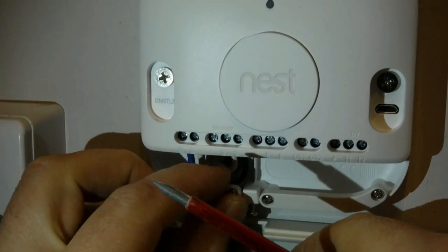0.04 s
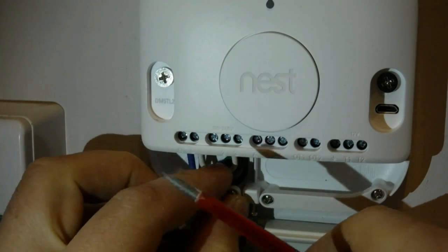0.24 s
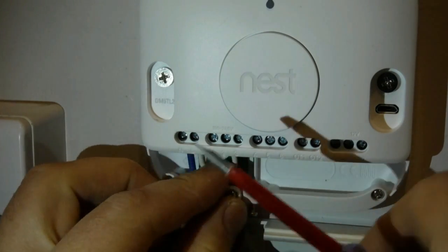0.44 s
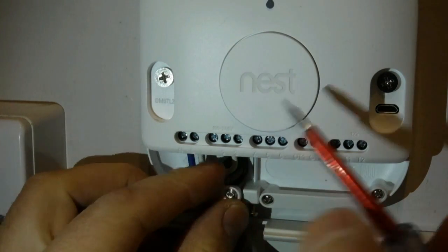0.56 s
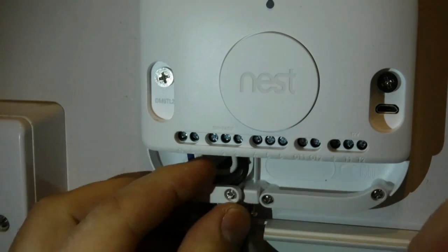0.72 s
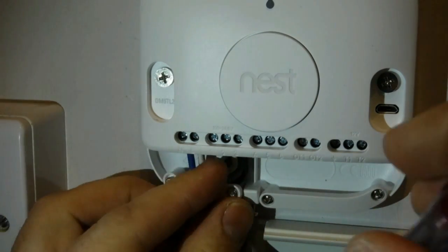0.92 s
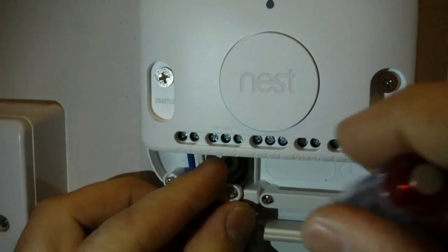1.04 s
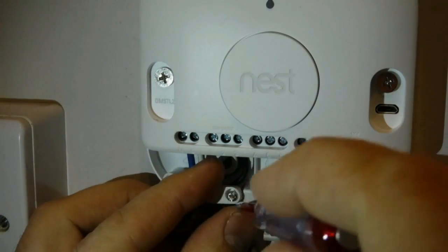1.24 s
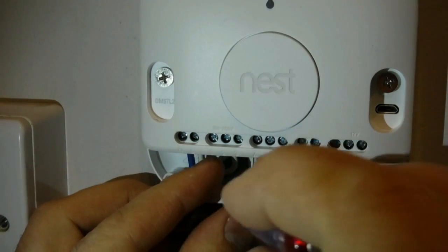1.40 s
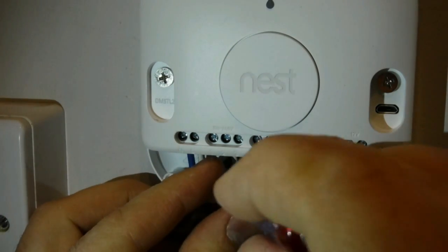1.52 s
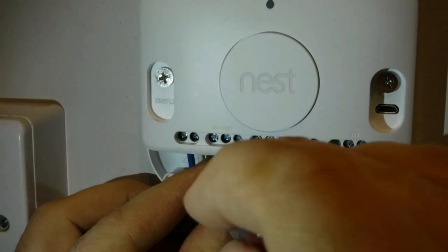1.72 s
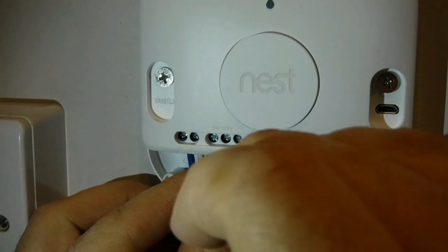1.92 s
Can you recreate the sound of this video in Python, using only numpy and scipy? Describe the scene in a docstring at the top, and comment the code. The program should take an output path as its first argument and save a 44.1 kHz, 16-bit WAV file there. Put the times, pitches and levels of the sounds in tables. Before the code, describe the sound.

Hard plastic clamp snaps sharply twice against a wall housing, with faint rubbing and small ticks

```python
"""In a small room, fingers and a screwdriver work a plastic clamp into a wall-mounted housing.
Snaps and ticks are impulses exciting damped modes; the steel tip rings once in the same way.
Rubbing is filtered grain noise with rough squeaks; dull knocks are decaying low sines.
Drifting low tones and coloured noise lie below; a diffuse echo follows the snaps and ticks."""
import sys
import numpy as np
from scipy import signal
from scipy.fft import rfft, irfft
from scipy.io import wavfile

SR = 44100
rng = np.random.default_rng(int(sys.argv[2]) if len(sys.argv) > 2 else 0)


def attenuation_scalar(level_db):
    """Turn a level in dB into a linear amplitude multiplier (20 dB per decade)."""
    decades = np.asarray(level_db, float) / 20
    return 10 ** decades


def digitize_waveform(pressure):
    """Quantize a signal to 16-bit integers and store it at the path in sys.argv[1].

    Rows of a 2-D input are taken as channels; values are limited to [-1, 1].
    """
    field = np.atleast_2d(pressure).T
    bounded = np.clip(field, -1, 1)
    quanta = np.round(bounded * 32767).astype(np.int16)
    wavfile.write(sys.argv[1], SR, quanta)


N = 85995   # length [samples]

# steady noise spectrum of the room, relative: (frequency [Hz], density [dB per Hz])
ROOM_SPECTRUM = [(12, -36), (20, -3), (63, -9), (113, -9.5), (177, -7.5), (293, -12), (377, -12),
                 (949, -16), (1530, -19.5), (2750, -24.5), (3340, -22.5), (12800, -26.5), (16000, -29.5)]
ROOM_TONE_DB = -53   # rms
WHIRR_HZ, WHIRR_WIDTH_HZ, WHIRR_DB = 1585, 210, -63.5   # steady band in the room tone
# shuffling hands, low-mid noise before a common 6.5 dB cut: (time [s], level [dB])
SHUFFLE = [(0.0, -53), (0.352, -55), (1.052, -48.5), (1.498, -58), (1.95, -57)]

# wavering low hum: (time [s], level [dB])
HUM = [(0.0, -58), (0.02, -58), (0.358, -65), (0.374, -64), (0.494, -49), (0.612, -53.5), (0.722, -65),
       (0.824, -52), (0.994, -50.5), (1.704, -62.5), (1.738, -64.5), (1.95, -60)]
HUM_HZ, HUM_WANDER_HZ = 60.6, 3.3
# lower handling rumble: (time [s], level [dB])
RUMBLE_LOW = [(0.0, -65), (0.248, -73), (0.52, -60), (0.602, -79), (0.754, -48), (0.858, -47.5),
              (0.89, -67), (1.102, -73), (1.15, -43.5), (1.238, -70), (1.302, -43), (1.374, -58),
              (1.688, -68.5), (1.95, -65)]
# upper handling rumble: (time [s], level [dB])
RUMBLE_HIGH = [(0.0, -73), (0.016, -74), (0.58, -59), (0.624, -68), (0.808, -47), (1.058, -68.5),
               (1.2, -48), (1.248, -65), (1.292, -48.5), (1.4, -75), (1.438, -53.5), (1.808, -81),
               (1.884, -54.5), (1.95, -61)]
# pitch of the lower and upper rumble: (frequency [Hz], rms wander [Hz])
RUMBLE_PITCHES = [(95, 7.3), (170, 8.2)]

# the clamp strikes the housing: (time [s], level before a common 3 dB cut [dB],
# added housing gain [dB], rattle decay constant [s], centre of the crack [Hz])
SNAPS = [(0.0236, -34, -40, .0005, 9000), (0.122, -27, -14, 0.0023, 8000),
         (0.1242, -11.5, -20, 0.00018, 7500), (0.1251, -1.5, -29.5, 0.00036, 8550),
         (0.1261, -3, -24.5, 0.0016, 9200), (0.21, -31.5, -47, .002, 7800), (0.404, -43, -27, 0.0022, 7500),
         (0.8215, -14, -7.5, 0.00079, 6900), (0.8233, -13, -13.5, 0.0014, 8800),
         (0.8249, -14, -16, .002, 8450), (0.965, -37, -8, 0.00077, 7000), (0.969, -25, -10, 0.0032, 6600),
         (1.061, -40.5, -6.5, 0.0026, 5000), (1.147, -37.5, -14, .002, 7500),
         (1.185, -37, -30, .004, 11400), (1.27, -44, -30, .002, 7000), (1.2834, -28, -19, 0.0027, 7200),
         (1.8503, -39, -34, 0.0023, 6060), (1.8935, -39, -22, .0005, 6500), (1.895, -30, -15, 0.0011, 6000),
         (1.9085, -44, -30, .001, 6900), (1.9132, -30, -30, .001, 6500), (1.9231, -35, -34, .002, 7000),
         (1.9252, -27.5, -30, 0.0022, 5460), (1.9305, -39, -30, .002, 6000),
         (1.9365, -33, -26, 0.0011, 7400), (1.943, -38, -28, 0.0028, 6240)]
# bright modes of the clamp: (frequency [Hz], level before spread and fall [dB], t60 [s])
CLAMP_MODES = [(3800, -16, 0.012), (5200, -13.5, 0.0077), (6100, -7.5, 0.012), (6800, -3, 0.0035),
               (7400, -3, 0.0078), (7630, -7.5, 0.0093), (8900, -0.5, 0.0062), (9830, -6, 0.009),
               (10980, -6.5, 0.0038), (11980, -9.5, 0.0035), (11870, -8.5, 0.0034), (13600, -8, 0.0047),
               (15700, -14, .003)]
# low modes of the housing: (frequency [Hz], level before spread [dB], t60 [s])
HOUSING_MODES = [(335, -8, 0.013), (491, -15, 0.047), (747, -9, 0.042), (1227, -3.5, 0.014),
                 (1680, -2, 0.0088), (1930, -2, 0.0058), (2590, 0.5, 0.014), (3400, 3, 0.0031),
                 (4120, 1.5, 0.0041)]
RATTLE_PER_S, RATTLE_SPREAD_DB = 3000, 4
MODE_SPREAD_DB = 1.5   # standard deviation from strike to strike
MODE_FALL_DB = 10   # loss one octave from the crack's centre; grows with octaves squared
CLAMP_LOW_CUT_HZ = 3200
CRACK_DB, CRACK_OCTAVES = 17, 0.84   # gain and width of the dry contact crack
SPOTS = 3   # strikes land on different spots, each with its own echo pattern

# echo of the room, before a common 22.5 dB cut: (frequency [Hz], t60 [s], level [dB])
ECHO = [(400, 0.24, -3), (1020, 0.14, -3.5), (3020, 0.15, -3.5), (5000, 0.15, -2.5), (7500, 0.18, -9.5),
        (11200, 0.11, -5), (14700, .09, -9.5)]
ECHO_START_S = 0.002
EARLY_DB, EARLY_T60_S = 2.5, 0.024   # nearby wall: stronger first echoes

# fingers rub plastic: (start [s], length [s], level [dB], centre [Hz], width [octaves])
RUBS = [(0.049, 0.064, -52, 6500, 1), (0.313, 0.1, -55, 7540, 0.52), (0.427, 0.05, -51.5, 8130, 0.35),
        (0.429, 0.037, -52.5, 3470, 1.1), (0.54, 0.033, -54.5, 1580, 1.4), (0.668, .14, -47.5, 7400, 0.78),
        (0.903, .06, -58, 7500, 0.64), (0.973, 0.094, -55, 8800, .9), (1.104, 0.13, -55.5, 7900, 0.69)]
RUB_GRAINS_PER_S, RUB_UNEVEN_DB = 9900, 1.5
STROKE_ATTACK_S, STROKE_RELEASE_S = 0.019, 0.02
# thin squeaks in the rubbing: (start [s], length [s], level [dB], from [Hz], to [Hz])
SQUEAKS = [(0.07, .025, -58, 3000, 3020), (0.67, 0.16, -52, 2960, 3030), (0.689, 0.069, -52.5, 7100, 7300),
           (0.694, 0.046, -55, 8900, 8900)]
SQUEAK_ROUGH_HZ = 170   # upper edge of the noise modulating each squeak

# dull knocks through the wall plate: (time [s], level [dB], frequency [Hz], t60 [s])
KNOCKS = [(0.065, -48, 800, 0.045), (0.073, -44, 750, 0.045), (0.579, -46, 400, 0.19),
          (0.845, -55, 360, 0.065), (0.854, -33, 702, .09), (0.879, -44, 730, 0.039),
          (1.064, -40.5, 760, .06)]
KNOCK_RISE_PER_S = 1200   # rate of the exponential onset

# tiny single-pitched ticks: (time [s], level [dB], frequency [Hz])
PIPS = [(0.328, -47, 3070), (0.372, -45, 3500), (1.172, -43.5, 5170), (1.221, -41.5, 5200)]
PIP_T60_S = 0.0079
# the steel tip touches: (time [s], level [dB])
TIP_TOUCH = [(0.557, -40.5)]
# modes of the screwdriver shaft: (frequency [Hz], level relative to the touch [dB], t60 [s])
SHAFT_MODES = [(2296, -10, 0.11), (6400, -7, 0.035), (7677, -8.5, 0.18), (9240, -7, 0.066),
               (9600, -16, .07), (10600, -14, 0.18), (11600, -16, .05)]

TOP_CUT_HZ = 16400


def rms_one(x):
    """Power normalisation: scale to unit root mean square."""
    return x / np.sqrt(np.mean(x ** 2) + 1e-20)


def level_curve(rows):
    """Linear interpolation of a level [dB] over time, at every sample."""
    s, db = np.transpose(rows)
    return np.interp(np.arange(N) / SR, s, db)


def band(x, low_hz, high_hz):
    """Band-pass filtering with a maximally flat (Butterworth) response."""
    sos = signal.butter(2, [low_hz, high_hz], "band", fs=SR, output="sos")
    return signal.sosfilt(sos, x)


def octave_edges(centre_hz, octaves):
    """Logarithmic pitch: band edges lie equal ratios about the centre."""
    half = 2 ** (octaves / 2)
    return centre_hz / half, centre_hz * half


def ring(clicks, hz, t60):
    """Damped resonance: a unit impulse excites an exponentially decaying sine."""
    radius = attenuation_scalar(-60 / (t60 * SR))
    angle = 2 * np.pi * hz / SR
    feedback = [1, -2 * radius * np.cos(angle), radius ** 2]
    return signal.lfilter([0, np.sin(angle)], feedback, clicks + 1e-18)


def click_at(s):
    """Impulsive excitation: one unit sample at time s."""
    return 1.0 * (np.arange(N) == int(s * SR))


def grains(per_s, spread_db, size):
    """Shot noise: random impulses of uneven size and either sign."""
    hits = rng.random(size) < per_s / SR
    heights = attenuation_scalar(spread_db * np.minimum(rng.exponential(1, size), 3))
    return hits * heights * rng.choice([-1, 1], size)


def stroke(s, length):
    """Amplitude envelope: linear attack, hold, exponential release."""
    t = np.arange(N) / SR
    attack = np.clip((t - s) / STROKE_ATTACK_S, 0, 1)
    return attack * np.exp(-np.maximum(t - s - length, 0) / STROKE_RELEASE_S)


def room_tone():
    """Stationary noise shaped by a spectral density, with a steady whirr and shuffling low mids."""
    hz = np.arange(N // 2 + 1) * SR / N + 1e-3
    f, db = np.transpose(ROOM_SPECTRUM)
    colour = attenuation_scalar(np.interp(np.log(hz), np.log(f), db))
    tone = rms_one(irfft(rfft(rng.standard_normal(N)) * colour, N))
    half = WHIRR_WIDTH_HZ / 2
    whirr = rms_one(band(rng.standard_normal(N), WHIRR_HZ - half, WHIRR_HZ + half))
    low_mids = rms_one(band(rng.standard_normal(N), 167, 2190))
    shuffle = attenuation_scalar(level_curve(SHUFFLE) - 6.5) * low_mids
    return attenuation_scalar(ROOM_TONE_DB) * tone + attenuation_scalar(WHIRR_DB) * whirr + shuffle


def wavering(curve, hz, wander_hz):
    """Frequency modulation: slow band noise makes a low tone's pitch drift."""
    noise = rng.standard_normal(N + SR)   # the first second lets the filter settle
    wander = rms_one(band(noise, 2.05, 13.3)[SR:])
    phase = 2 * np.pi * np.cumsum(hz + wander_hz * wander) / SR
    return attenuation_scalar(level_curve(curve)) * np.sqrt(2) * np.sin(phase)


def rumble():
    """Superposition of a hum and two handling tones, each with its own level curve."""
    total = wavering(HUM, HUM_HZ, HUM_WANDER_HZ)
    for curve, (hz, wander_hz) in zip((RUMBLE_LOW, RUMBLE_HIGH), RUMBLE_PITCHES):
        total = total + wavering(curve, hz, wander_hz)
    return total


def rattling_contact(rattle_s, size):
    """Repeated impact: a click and exponentially dying grains, scaled to unit energy."""
    decay = np.exp(-np.arange(size) / (rattle_s * SR))
    force = 0.2 * grains(RATTLE_PER_S, RATTLE_SPREAD_DB, size) * decay
    force[0] = 1
    return force / np.sqrt(np.sum(force ** 2))


def modes(force, table, crack_hz=None):
    """Modal superposition: modes alternate in sign and, given a crack pitch, weaken away from it."""
    total = 0
    for k, (hz, db, t60) in enumerate(table):
        db = db + MODE_SPREAD_DB * rng.normal()
        if crack_hz is not None:
            db -= MODE_FALL_DB * np.log2(hz / crack_hz) ** 2
        total = total + attenuation_scalar(db) * (-1) ** k * ring(force, hz, t60)
    return total


def snaps():
    """Impact excitation: each contact gives a dry crack and rings clamp and housing; a row per spot."""
    size = 4000   # samples kept of each strike
    out = np.zeros((SPOTS, N + size))
    low_cut = signal.butter(2, CLAMP_LOW_CUT_HZ, "high", fs=SR, output="sos")
    for i, (s, db, housing_db, rattle_s, crack_hz) in enumerate(SNAPS):
        force = rattling_contact(rattle_s, size)
        crack = attenuation_scalar(CRACK_DB) * band(force, *octave_edges(crack_hz, CRACK_OCTAVES))
        clamp = signal.sosfilt(low_cut, modes(force, CLAMP_MODES, crack_hz) + crack)
        housing = attenuation_scalar(housing_db) * modes(force, HOUSING_MODES)
        start = int(s * SR)
        out[i % SPOTS, start:start + size] += attenuation_scalar(db - 3) * (clamp + housing)
    return out[:, :N]


def room(x):
    """Diffuse reverberation: convolution with noise that decays exponentially band by band."""
    t = np.arange(SR // 2) / SR
    edges = 250 * 2 ** np.arange(0, 6.2, 0.5)   # half-octave bands [Hz]
    f, t60, db = np.transpose(ECHO)
    tail = 0
    for low, high in zip(edges, edges[1:]):
        centre = np.log(low * high) / 2   # log of the geometric mean
        band_db = np.interp(centre, np.log(f), db)
        band_t60 = np.interp(centre, np.log(f), t60)
        noise = band(rng.standard_normal((SPOTS, len(t))), low, high)
        tail = tail + noise * attenuation_scalar(band_db - 60 * t / band_t60)
    early = 1 + attenuation_scalar(EARLY_DB - 60 * t / EARLY_T60_S)
    echo = attenuation_scalar(-22.5) * tail * early * (t > ECHO_START_S)
    return signal.fftconvolve(x, echo, axes=1)[:, :N]


def rubs():
    """Friction noise: dense micro-impacts through a band, under an uneven stroke."""
    out = 0
    for s, length, db, hz, octaves in RUBS:
        uneven = attenuation_scalar(RUB_UNEVEN_DB * rms_one(band(rng.standard_normal(N), 19, 85)))
        hiss = rms_one(band(grains(RUB_GRAINS_PER_S, 2.0, N), *octave_edges(hz, octaves)))
        out = out + attenuation_scalar(db) * stroke(s, length) * uneven * hiss
    return out


def knocks():
    """Damped low vibration: each soft push gives one sine with a smooth onset and exponential decay."""
    t, out = np.arange(N) / SR, 0
    for s, db, hz, t60 in KNOCKS:
        onset = 1 - np.exp(-np.maximum(t - s, 0) * KNOCK_RISE_PER_S)
        decay = attenuation_scalar(-60 * np.abs(t - s) / t60)
        out = out + attenuation_scalar(db) * np.sin(2 * np.pi * hz * t) * onset * decay
    return out


def squeaks():
    """Quadrature modulation: two noises roughen each tone, some of which glide in pitch."""
    t, out = np.arange(N) / SR, 0
    for s, length, db, from_hz, to_hz in SQUEAKS:
        rough = band(rng.standard_normal((2, N)), 7.8, SQUEAK_ROUGH_HZ)
        hz = np.interp(t, [s, s + length], [from_hz, to_hz])
        phase = 2 * np.pi * np.cumsum(hz) / SR
        tone = rms_one(rough[0] * np.cos(phase) + rough[1] * np.sin(phase))
        out = out + attenuation_scalar(db) * stroke(s, length) * tone
    return out


def pips():
    """Single-mode resonance: each impulse rings one short pitch."""
    return sum(attenuation_scalar(db) * ring(click_at(s), hz, PIP_T60_S) for s, db, hz in PIPS)


def tip_ring():
    """Modal ringing of a steel shaft: the touch excites all its modes at once."""
    out = 0
    for s, db in TIP_TOUCH:
        for hz, mode_db, t60 in SHAFT_MODES:
            out = out + attenuation_scalar(db + mode_db) * ring(click_at(s), hz, t60)
    return out


def scene():
    """Linear superposition: direct snaps and ticks, their echo, and the layers that have no echo."""
    near = snaps()
    near[0] += pips() + tip_ring()
    struck = (near + room(near)).sum(axis=0)
    handled = knocks() + rubs() + squeaks() + rumble()
    return (struck + handled + room_tone())[None]


def band_limit(x):
    """A steep low-pass at the top of the band."""
    return signal.sosfilt(signal.butter(12, 16540, fs=SR, output="sos"), x)


def record(dry):
    """Soft saturation rounds the peaks, then a steep low-pass removes the top."""
    rounded = 1.05 * np.tanh(dry / 1.05)
    low_pass = signal.cheby2(10, 40, TOP_CUT_HZ, fs=SR, output="sos")   # order, stop-band loss [dB]
    finished = signal.sosfilt(low_pass, rounded)
    return band_limit(finished)


dry = scene()
out = record(dry)
digitize_waveform(out)
```